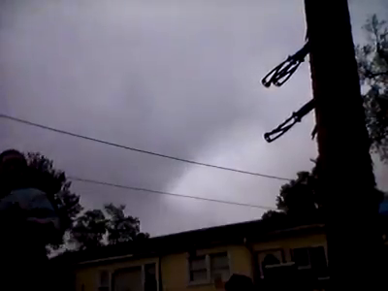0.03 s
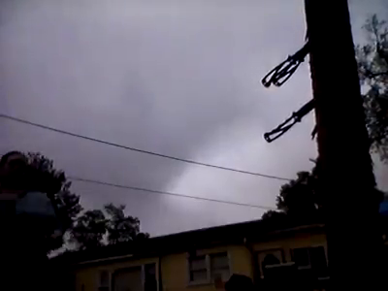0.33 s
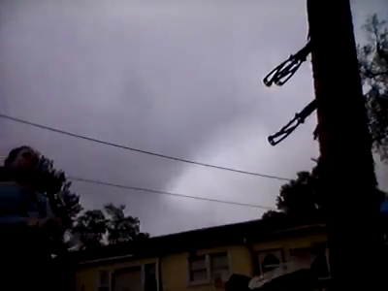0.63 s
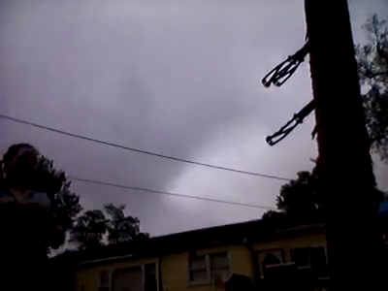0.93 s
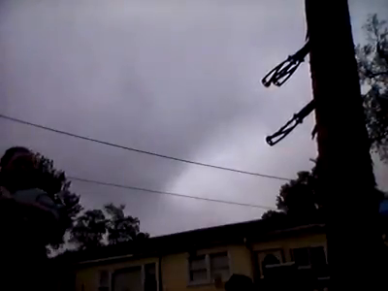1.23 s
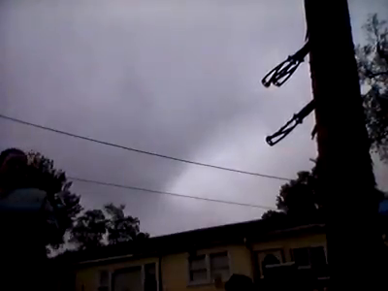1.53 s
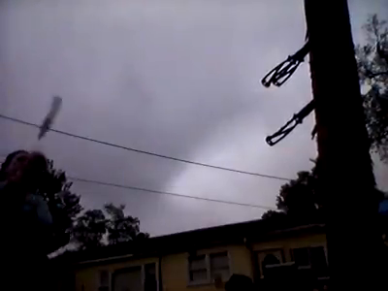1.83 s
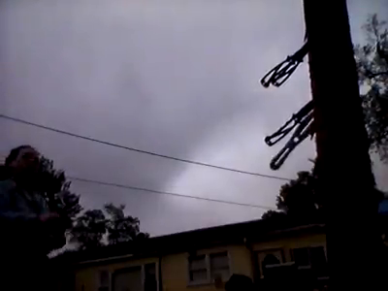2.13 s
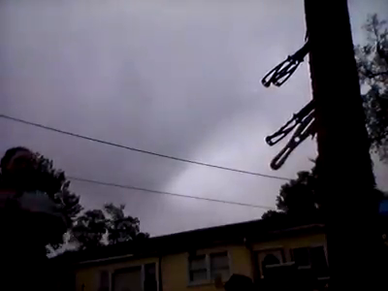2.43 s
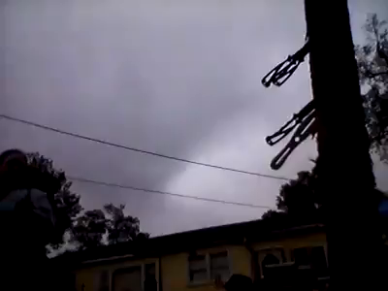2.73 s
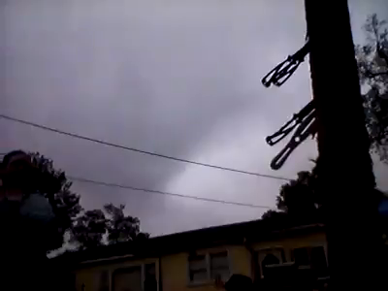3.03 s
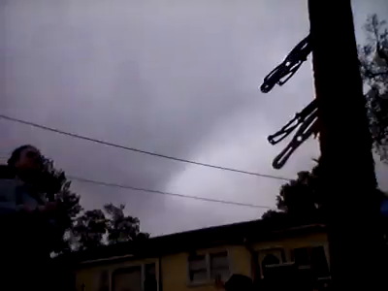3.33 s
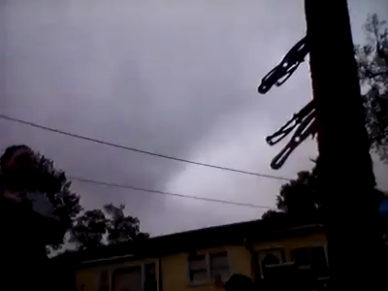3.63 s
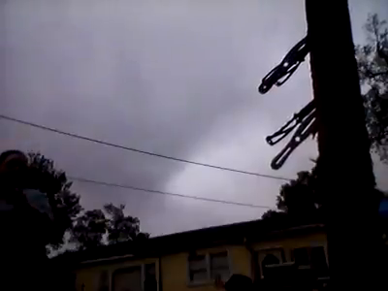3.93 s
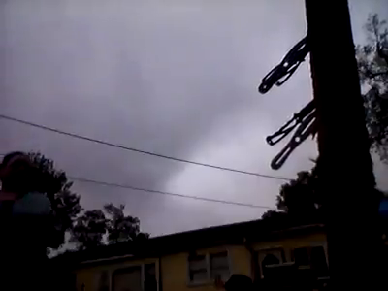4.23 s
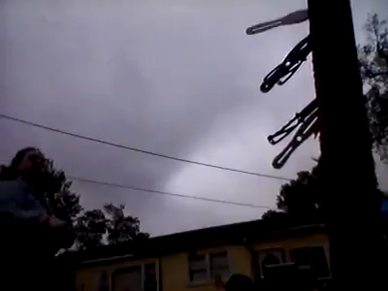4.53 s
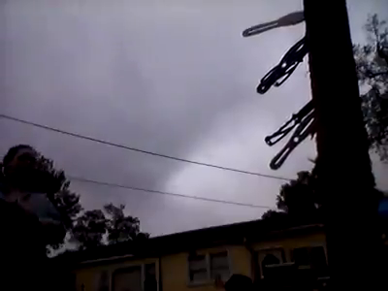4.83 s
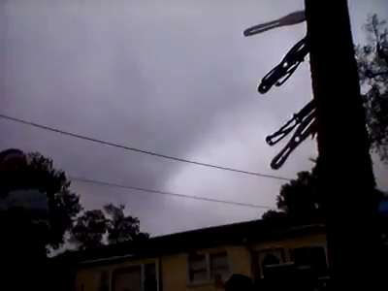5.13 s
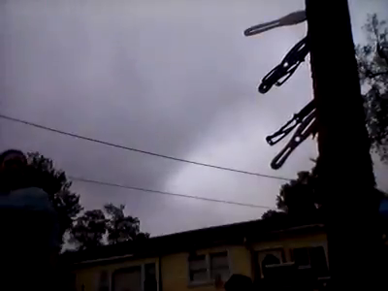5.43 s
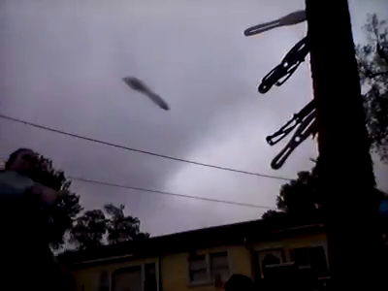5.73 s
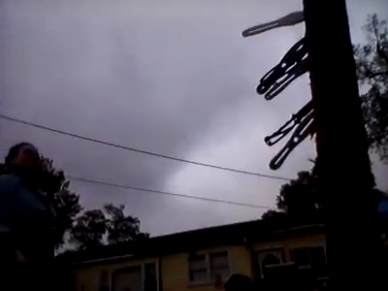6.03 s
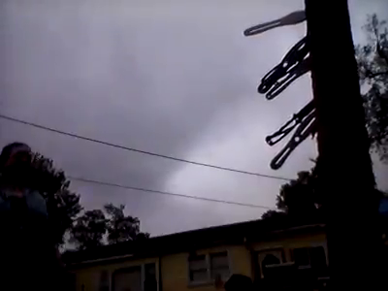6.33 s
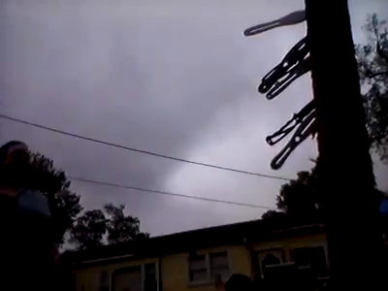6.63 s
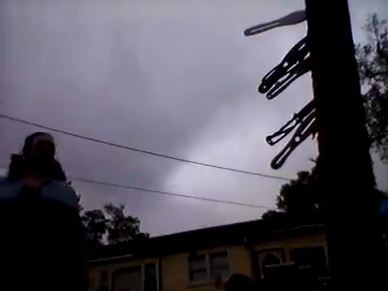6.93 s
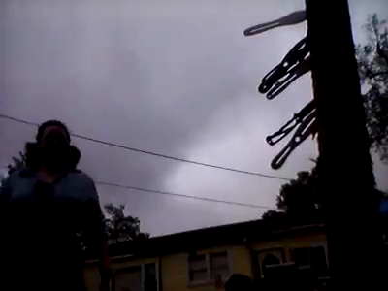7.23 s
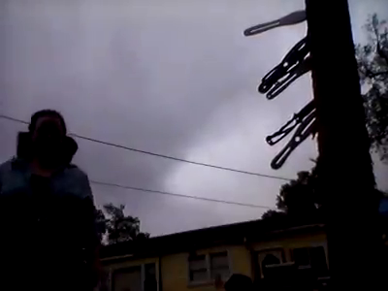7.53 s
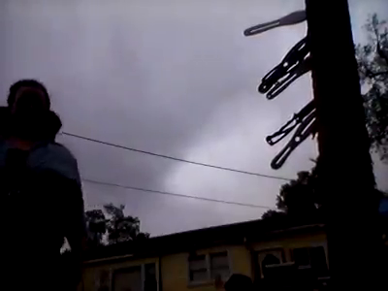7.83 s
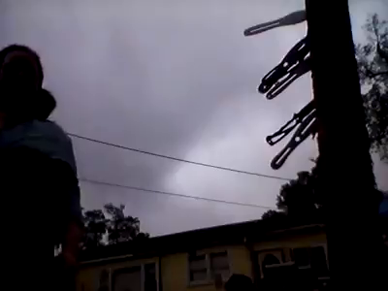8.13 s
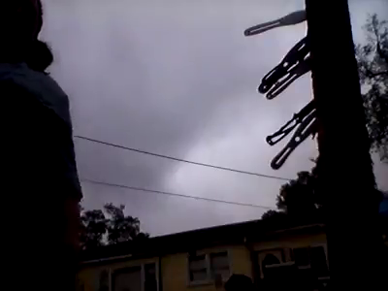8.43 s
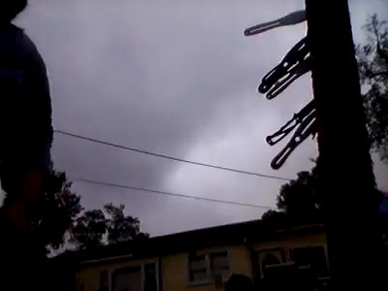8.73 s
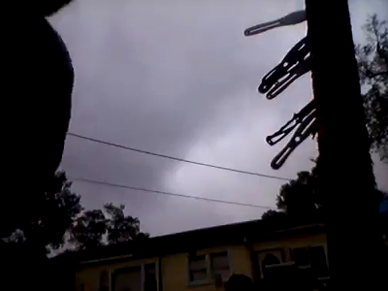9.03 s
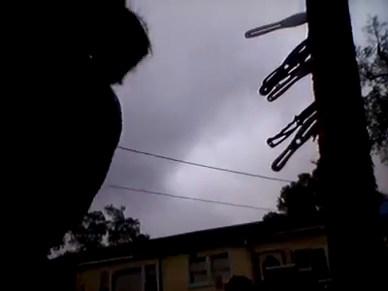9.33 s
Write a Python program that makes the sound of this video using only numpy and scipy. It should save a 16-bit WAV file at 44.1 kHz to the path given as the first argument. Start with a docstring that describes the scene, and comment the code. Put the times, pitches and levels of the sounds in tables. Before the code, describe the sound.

Outdoors, over a low traffic rumble, a thrown knife clashes with another blade and bites into a wooden post close to the microphone. Four more follow at a steady pace, each with a thin metallic zing and a loud, cracking thud, while blades scrape and tick in between. A bird repeats soft rising whistles. After the last knife rings out, the thrower approaches with swishing clothes and light scuffs, then grabs the microphone with a few knocks.

```python
"""Knife throwing in a back yard

Five steel knives sing in flight and thud into a wooden post, exciting its modes; two clash with knives
stuck there. After each throw the next blade is drawn with stick-slip friction. Birds whistle over distant
traffic. The thrower walks up and grabs a small camera, whose microphone overloads on every blow."""
import sys
import numpy as np
from scipy import signal
from scipy.fft import rfft, irfft, next_fast_len
from scipy.io import wavfile

SR = 44100
rng = np.random.default_rng(int(sys.argv[2]) if len(sys.argv) > 2 else 0)


def master_out(mix):
    """Clip the mix to full scale and print it as 16-bit PCM to the path in sys.argv[1]."""
    frames = np.transpose(np.atleast_2d(mix))
    ceiling = np.clip(frames, -1, 1)
    pcm = np.round(ceiling * 32767).astype(np.int16)
    wavfile.write(sys.argv[1], SR, pcm)


N = 414540

CLASH_S = .651  # the first blade strikes a stuck one
# Blades bite the post. Each row: start in seconds; thud, crack, splintering and steel ring in dB;
# the spot's low knock in Hz and its dB; its high knock in Hz and its dB.
HITS = [(.678, -2.5, 0, -10, -16.5, 622, 3, 1366, 4.5), (2.025, -1, -2, -6, -29, 706, -3.5, 1520, -1.5),
        (3.338, -1.5, -1, -8, -17, 788, 1, 1457, -9), (4.581, -2.5, -4, -4.5, -42, 648, 0.5, 1460, 1.5),
        (5.875, -3.5, -0.5, -5.5, -5.5, 603.4, -6, 1470, -7)]
# Spectra of a steel tick and of rubbed cloth. Each row: frequency in Hz, relative density in dB.
TICK_SPECTRUM = [(350, -47), (600, -19), (2340, -8.5), (2710, -12), (3420, -8.5), (3920, -17), (6650, -8),
                 (7830, -15.5), (10900, -2.5), (15400, -21)]
FABRIC_SPECTRUM = [(880, -15), (1500, -5.5), (2350, -5), (3240, -11.5), (6360, -10), (7430, -8.5),
                   (11100, -1.5), (12200, 2.5), (15400, -15.5)]


def amp(db):
    """Decibels to amplitude ratio."""
    return 10 ** (np.asarray(db) / 20)


def unit(x):
    """Normalisation to rms 1."""
    return x / np.sqrt(np.mean(x ** 2) + 1e-20)


def clock():
    """Seconds at every sample."""
    return np.arange(N) / SR


def along(points, hz):
    """Interpolation of (Hz, value) points on a logarithmic frequency axis."""
    f, v = np.transpose(points)
    return np.interp(np.log(hz + 1), np.log(f + 1), v)


def wobble(rate, size=N):
    """Random modulation: a curve through `rate` Gaussian knots a second."""
    knots = rng.standard_normal(int(size * rate / SR) + 4)
    return np.interp(np.arange(size) * rate / SR, np.arange(len(knots)), knots)


def noise(spectrum, size=N):
    """Spectral shaping: coloured noise of rms 1."""
    m = next_fast_len(size)
    gain = amp(along(spectrum, np.fft.rfftfreq(m, 1 / SR)))
    return unit(irfft(rfft(rng.standard_normal(m)) * gain, m)[:size])


def narrow(hz, width_hz, size):
    """Resonance: noise of rms 1 through a single peak."""
    f = np.fft.rfftfreq(size, 1 / SR)
    return unit(irfft(rfft(rng.standard_normal(size)) / (1 + ((f - hz) / width_hz) ** 2), size))


def steely(spectrum, size):
    """Modal overlap: noise of rms 1 through the many close, short resonances of a blade."""
    t = clock()[:SR // 50]
    body = rng.standard_normal(len(t)) * np.exp(-t / .004)
    return unit(signal.fftconvolve(noise(spectrum, size + len(t) - 1), body, "valid"))


def ring(modes, t, scatter_db):
    """Free vibration: a sum of damped modes, struck at random phases and scattered strengths."""
    return sum(amp(db + scatter_db * rng.standard_normal() - 60 * t / t60)
               * np.sin(2 * np.pi * (hz * t + rng.random())) for hz, db, t60 in modes)


def struck(t, t60):
    """The envelope of a tap: a quick rise and exponential decay."""
    return amp(-60 * t / t60) * (1 - np.exp(-t / 0.0015))


def add(track, s, sound):
    """Superposition: mix a sound in at s seconds."""
    part = track[max(round(s * SR), 0):][:len(sound)]
    part += sound[:len(part)]


def echo(x, decay, delay_s):
    """Reverberation: a diffuse tail in which each frequency dies at its own rate."""
    hz, t, z = signal.stft(rng.standard_normal(SR), SR, nperseg=256)
    tail = signal.istft(z * amp(-60 * t / along(decay, hz)[:, None]), SR, nperseg=256)[1]
    response = np.pad(tail / np.linalg.norm(tail), (int(delay_s * SR), 0))
    return signal.fftconvolve(x, response)[:N]


def traffic():
    """Broadband noise of distant traffic, with a faint wavering hum."""
    # Each row: frequency in Hz, relative density in dB.
    rumble_spectrum = [(11, -44), (20, 1), (38, -1.5), (87, -0.5), (190, -9), (300, -16.5), (420, -28.5),
                       (800, -75)]
    road_spectrum = [(180, -36), (300, -5), (372, -10.5), (517, -6.5), (719, -9), (1030, -8), (1930, -21),
                     (2500, -24.5), (5840, -35), (12300, -32), (15400, -41.5)]
    hum = amp(-47 + 2.5 * wobble(1.366)) * np.sin(2 * np.pi * 298 * clock() + 0.6 * wobble(6))
    rumble = amp(-30.5) * noise(rumble_spectrum)
    road = amp(-42) * noise(road_spectrum) * amp(1.1 * wobble(1.71))
    return rumble + road + hum


def whistle(length_s, first_hz, last_hz, bend):
    """Frequency modulation: a fluttering pure tone glides, straight at bend 1, later at a higher bend."""
    t = clock()[:int(length_s * SR)]
    glide = first_hz + (last_hz - first_hz) * (t / length_s) ** bend
    pitch = glide * (1 + .018 * wobble(260, len(t)))
    swell = np.sqrt(np.abs(np.sin(np.pi * t / length_s))) * amp(3.2 * wobble(110, len(t)))
    return swell * np.sin(2 * np.pi * np.cumsum(pitch) / SR)


def birds():
    """Two birds whistle; reverberation among the trees smears their notes."""
    # Each row: start in seconds, relative levels in dB of the rising note and of the slur before it.
    rising_calls = [(2.985, -40, -68), (4.156, -34, -34), (4.496, -33.5, -36), (4.846, -31, -30),
                    (5.223, -32, -33.5), (5.575, -31.5, -35)]
    # The second bird. Each row: start in seconds, relative level in dB.
    far_calls = [(.26, -45), (1.68, -52.5)]
    # Each row: frequency in Hz, reverberation time in seconds.
    tree_decay = [(1500, .32), (4000, 1.5)]
    out = np.zeros(N)
    for s, db, slur_db in rising_calls:
        add(out, s, amp(db) * whistle(length_s=.128, first_hz=2150, last_hz=3600, bend=2.2))
        add(out, s - .053, amp(slur_db) * whistle(length_s=.03, first_hz=2208, last_hz=1700, bend=.97))
    for s, db in far_calls:
        add(out, s, amp(db) * whistle(length_s=.23, first_hz=3300, last_hz=2900, bend=1.6))
    return amp(-3) * out + amp(-1.5) * echo(out, tree_decay, delay_s=0.029)


def blade(t, shake_db, rate, sung_hz=0, sung_db=0):
    """A blade's high modes decay, each wavering on its own; the one near sung_hz sings out."""
    # Each row: frequency in Hz, level in dB, 60 dB decay time in seconds.
    blade_modes = [(6185, -21, .6), (8064, -14, .8), (8812, -16, .5), (9561, -16, .8), (10310, -8, .7),
                   (11060, 0, .9), (12190, -1, .9), (13310, -14, .6), (14810, -9, 1.1)]
    out = np.zeros(len(t))
    for hz, db, t60 in blade_modes:
        boost_db = sung_db * (abs(hz - sung_hz) < .03 * hz)
        mode = amp(db + boost_db - 60 * t / t60) * np.sin(2 * np.pi * (hz * t + rng.random()))
        out += mode * amp(shake_db * wobble(rate, len(t)))
    return out


def flights():
    """Free vibration: a blade scrapes off the hand and sings, wavering as it tumbles, until impact."""
    # Each row: start in seconds, ring in dB, scrape in dB, the singing mode in Hz, its boost in dB.
    throws = [(.567, -32, -63, 11060, 5), (1.933, -31.5, -40, 8064, 9), (3.235, -29, -39.5, 10310, 2),
              (3.263, -23.5, -43, 12190, 7), (4.46, -47, -35, 14810, 13), (5.781, -40.5, -40, 9561, 16)]
    out, t = np.zeros(N), clock()[:SR // 4]
    impacts = [CLASH_S] + [hit[0] for hit in HITS]
    for s, db, scrape_db, sung_hz, sung_db in throws:
        end = min(impact for impact in impacts if impact > s)
        song = amp(db) * blade(t, shake_db=1.6, rate=50, sung_hz=sung_hz, sung_db=sung_db)
        scrape = amp(scrape_db - 60 * t / 0.76) * narrow(11200, 2000, len(t))
        airborne = np.clip(t / 0.0049, 0, 1) * np.clip((end - s - t) / 0.023, 0, 1)
        add(out, s, (song + scrape) * airborne)
        swish = amp(-44 - 120 * abs(t - .05)) * noise(FABRIC_SPECTRUM, len(t))
        add(out, s - .05, swish)
    return out


def buzzing(rate, depth_db, drift, half_width_s=0.043):
    """Repeated knocks drive modes that swell in turn, roughly highest first, and drift in phase."""
    # Each row: frequency in Hz, level in dB, time of the peak in seconds.
    clash_modes = [(1400, -14, .9), (1863, -1, .868), (2335, 3, .825), (2930, 1, .84), (3830, -4, .85),
                   (4081, -3, .87), (4175, -1, .87), (6105, 0, .825), (6750, -6, .75), (8506, -4, .815),
                   (8860, -5, .79), (9561, 1, .765), (9878, -5, .87), (10435, -3, .87), (11062, 7, .8),
                   (13312, 3, .705), (14812, 1, .705)]
    t = clock()[:2 * SR]
    tones = np.zeros(len(t))
    for hz, db, peak_s in clash_modes:
        random_walk = np.cumsum(wobble(2 * rate, len(t))) * np.sqrt(2 * rate) / SR
        phase = drift * np.sqrt(clash_modes[0][0] / hz) * random_walk
        swell = amp(db + depth_db * wobble(rate, len(t))) / np.hypot(1, (t - peak_s) / half_width_s)
        tones += swell * np.sin(2 * np.pi * hz * t + phase)
    return np.pad(tones, (0, N - len(t)))


def shaken(build_s, held_db, drop_db, fade_db_per_s, chatter_s=0.25, parting_s=0.036):
    """The envelope of forced vibration: it builds as blades chatter, drops as they part, then decays."""
    t = clock() - CLASH_S
    free = np.maximum(t - chatter_s, 0)
    level_db = held_db - drop_db * np.minimum(free / parting_s, 1) - fade_db_per_s * free
    return np.clip(t / build_s, 0, 1) * amp(level_db)


def chatter():
    """Intermittent contact: the first knife scrapes and rattles on its neighbour, then both ring free."""
    # Each row: frequency in Hz, relative density in dB.
    rasp_spectrum = [(180, -45), (300, -12), (476, -16), (640, -11), (1320, -14), (2170, -16), (2920, -13),
                     (5290, -21), (8700, -16), (13000, -10), (15400, -18)]
    t = clock() - CLASH_S
    glance = (t > 0) * amp(-4 - 60 * np.abs(t) / 0.51)
    rasping = np.hypot(glance, shaken(build_s=0.1, held_db=-18, drop_db=2.5, fade_db_per_s=99))
    ringing = shaken(build_s=.03, held_db=-19.5, drop_db=8, fade_db_per_s=60)
    tones = buzzing(rate=80, depth_db=3.5, drift=13)
    rattle = amp(2 * wobble(250))
    return rattle * (ringing * tones + rasping * steely(rasp_spectrum, N))


def jolts():
    """High-pass overshoot: a shock holds the microphone aside; let go, it crosses centre and settles."""
    # Each row: start in seconds, level in dB, length of the push in seconds.
    shocks = [(.651, 0, 0.036), (5.883, -3.5, 0.028), (8.571, -19, 0.016), (9.337, -4.5, 0.0024),
              (9.364, -6, 0.00213), (9.396, -4.5, 0.0015)]
    out, t = np.zeros(N), clock()[:SR // 2]
    for s, db, length in shocks:
        release_s, settle_s = 0.36 * length, 2.05 * length
        push = (1 - np.exp(-t / 0.00049)) * np.exp(-np.maximum(t - length, 0) / release_s)
        leak = np.exp(-1 / (settle_s * SR))
        add(out, s, -amp(db) * signal.lfilter([1, -1], [1, -leak], push))
    return out


def thuds(crack_t60=0.041, wood_t60=0.16, crack_rise_s=.0008, boom_rise_s=0.0057):
    """Impact excitation: the point cracks in, fibres split, and the post's modes swell into a boom."""
    # Each row: frequency in Hz, level in dB, 60 dB decay time in seconds.
    post_modes = [(299, -20, .5), (334, -13.5, .42), (600, -12, .17), (815, -15, .17), (1290, -14, .08),
                  (1618, -13, .06), (2600, -1, .025)]
    # Each row: frequency in Hz, relative density in dB.
    crack_spectrum = [(180, -34), (300, -11), (1540, 8), (2030, -5), (2690, 1.5), (4200, -9), (5200, -11),
                      (9580, -9), (12300, -1), (15400, -13)]
    wood_spectrum = [(100, -22.5), (330, 5.5), (450, -7.5), (720, 4), (1020, -13.5), (1400, -8.5),
                     (2200, -20), (4300, -26), (14000, -40)]
    out, t = np.zeros(N), clock()[:SR // 2]
    for s, db, crack_db, wood_db, steel_db, low_hz, low_db, high_hz, high_db in HITS:
        modes = post_modes + [(low_hz, low_db, .1), (high_hz, high_db, .06)]
        boom = amp(db) * ring(modes, t, scatter_db=1.0)
        splinters = amp(wood_db - 60 * t / wood_t60) * noise(wood_spectrum, len(t))
        crack = amp(crack_db - 60 * t / crack_t60) * steely(crack_spectrum, len(t))
        steel = amp(steel_db - 60 * t / 0.17) * blade(t, shake_db=5, rate=204)
        # the knife quivers and knocks in its cut on every swing
        swings = np.sin(np.pi * (31 * t + .2 * wobble(25, len(t)))) ** 6
        quiver = amp(-18.5 - 60 * t / 0.47) * swings * narrow(1380, 500, len(t))
        add(out, s, (boom + splinters + quiver) * (1 - np.exp(-t / boom_rise_s)))
        add(out, s, (crack + steel) * (1 - np.exp(-t / crack_rise_s)))
    return out


def draws(grain_db=2.0, release_s=0.011, song_hz=2460):
    """Stick-slip friction: a blade slides ever faster along the next and its tip slips off with a tick."""
    # Each row: start in seconds, end in seconds, level in dB.
    strokes = [(1, 1.06, -22.5), (2.34, 2.427, -21.5), (3.647, 3.796, -18.5), (4.92, 5.048, -16.5),
               (6.195, 6.32, -19.5), (2.55, 2.587, -36.5), (4.024, 4.057, -29)]
    # Each row: frequency in Hz, relative density in dB.
    slide_spectrum = [(180, -35), (300, -6.5), (800, -6), (1180, 0), (1720, -6.5), (2300, -2), (3120, -0.5),
                      (4410, -8.5), (6340, -4.5), (8000, -16), (11500, -4.5), (15400, -18)]
    out, t = np.zeros(N), clock()[:SR // 4]
    for s, end, db in strokes:
        speed = np.minimum(t / (end - s), 1) ** 0.52 * np.exp(-np.maximum(t - end + s, 0) / release_s)
        # the rubbed steel sings most while it is still held near the hilt
        song = amp(-2 - 60 * t / 0.35) * narrow(song_hz, 190, len(t))
        friction = amp(db + grain_db * wobble(700, len(t))) * speed
        add(out, s, friction * (steely(slide_spectrum, len(t)) + song))
        add(out, end, amp(-24) * steely(TICK_SPECTRUM, len(t)) * struck(t, t60=0.028))
    return out


def contact(clack_hz, size):
    """Contact noise: the rough tick of steel on steel, with a clack of two resonances."""
    clack = narrow(clack_hz, 148, size) + amp(-8) * narrow(1.51 * clack_hz, 247, size)
    return (steely(TICK_SPECTRUM, size) + amp(-3) * clack) * amp(2.5 * wobble(258, size))


def clinks():
    """Steel taps steel, and a stuck knife knocks once just after the second hit; after the last throw one
    handle rings on in sympathetic vibration."""
    # Each row: start in seconds, tick in dB, ring in dB, the envelope's t60 in seconds, clack in Hz.
    taps = [(1.243, -21.5, -24, 0.064, 12360), (1.276, -30, -40, .12, 9530), (2.069, -23, -42, .11, 1340),
            (2.232, -24, -26, .16, 12880), (3.666, -24, -15, 0.38, 2540), (3.875, -22, -26.5, 0.184, 3400),
            (5.931, -17.5, -7.5, 0.08, 11300), (5.943, -22, -31, 0.72, 11400),
            (6.33, -21.5, -38.5, 0.028, 2380)]
    # Each row: frequency in Hz, level in dB, 60 dB decay time in seconds.
    handle_modes = [(2328, -26, 3.16), (9835, -55, 1.5), (13700, -66, 3)]
    out, t = np.zeros(N), clock()[:SR // 2]
    for s, tick_db, ring_db, t60, clack_hz in taps:
        tick = amp(tick_db) * contact(clack_hz, len(t))
        steel = amp(ring_db) * blade(t, shake_db=3.5, rate=170)
        add(out, s, (tick + steel) * struck(t, t60))
    t = clock()[:3 * SR]
    add(out, HITS[-1][0], ring(handle_modes, t, scatter_db=0) * (1 - np.exp(-t / 0.055)))
    return out


def rebounds():
    """Elastic recoil: a knife that has just stuck swings back and knocks against the wood."""
    # Each row: start in seconds, level in dB, clack in Hz.
    knocks = [(2.101, -12, 1490), (2.202, -19.5, 1520), (3.401, -23.5, 2400), (3.521, -21.5, 2400),
              (4.648, -17, 1350), (4.755, -23.5, 1610)]
    # Each row: frequency in Hz, relative density in dB.
    knock_spectrum = [(400, -23), (1300, 4), (3300, -3), (4500, -15), (14000, -14)]
    out, t = np.zeros(N), clock()[:SR // 4]
    for s, db, clack_hz in knocks:
        knock = 0.75 * steely(knock_spectrum, len(t)) + 0.58 * narrow(clack_hz, 170, len(t))
        add(out, s, amp(db) * knock * struck(t, t60=0.062))
    return out


def clothes(rustle_db=-47, nearest_s=9.7, approach_db_per_s=17.5):
    """Incoherent sources add in power: cloth rustles louder as the thrower nears, and limbs swish."""
    # Each row: time of the peak in seconds, level in dB, half-width in seconds.
    swishes = [(8.42, -36.5, .085), (8.58, -38.5, 0.042), (8.69, -35, 0.082), (9.1, -41.5, 0.055)]
    t = clock()
    power = amp(rustle_db - approach_db_per_s * np.abs(t - nearest_s)) ** 2
    for s, db, width in swishes:
        power += (amp(db) / (1 + ((t - s) / width) ** 2)) ** 2
    return np.sqrt(power) * noise(FABRIC_SPECTRUM) * amp(1.8 * wobble(150))


def scuffs():
    """Damped impacts: feet and fingers make short bursts of midrange noise."""
    # Each row: start in seconds, level in dB, 60 dB decay time in seconds.
    touches = [(8.675, -35.5, 0.34), (8.793, -22, 0.03), (9.335, -22.5, 0.04), (9.365, -12, 0.012)]
    # Each row: frequency in Hz, relative density in dB.
    scuff_spectrum = [(150, -19), (1200, 16.5), (2500, -1.5), (5000, -14), (14000, -17)]
    out, t = np.zeros(N), clock()[:SR // 4]
    for s, db, t60 in touches:
        add(out, s, amp(db - 60 * t / t60) * noise(scuff_spectrum, len(t)))
    return out


def grip(attack_s=.004, release_s=.01):
    """Friction noise: a hand touches, then grips the camera's case, rubbing as long as it presses."""
    # Each row: start in seconds, length in seconds, level in dB.
    presses = [(9.301, 0.066, -35.5), (9.365, .04, -16.5)]
    # Each row: frequency in Hz, relative density in dB.
    case_spectrum = [(120, -35), (200, 2), (741, -9), (1530, -8.5), (3290, -10.5), (4020, -17), (5380, -12),
                     (7880, -17), (12200, 2), (15400, -22.5)]
    pressure, t = np.zeros(N), clock()
    for s, length, db in presses:
        release = np.exp(-np.maximum(t - s - length, 0) / release_s)
        pressure += amp(db) * np.clip((t - s) / attack_s, 0, 1) * release
    return pressure * noise(case_spectrum) * amp(1.7 * wobble(700))


def scene():
    """Direct sound and reflection: the knives and their echo from the house, over the yard's sounds."""
    # Each row: frequency in Hz, reverberation time in seconds.
    yard_decay = [(200, 0.17), (1500, 1), (4000, 1), (12000, 0.77)]
    blows, scrapes = thuds(), draws()
    steel = flights() + clinks() + rebounds() + chatter()
    walls = echo(amp(-13.5) * blows + amp(-18) * (steel + .5 * scrapes), yard_decay, delay_s=.035)
    # the house front throws back the low boom of the post
    boom_band = signal.butter(2, [270, 400], "bandpass", fs=SR, output="sos")
    add(walls, .108, amp(-10.5) * signal.sosfilt(boom_band, blows))
    knives = blows + steel + scrapes + walls
    return (knives + jolts() + birds() + clothes() + grip() + scuffs() + traffic())[None]


def record(dry, hardness=5, top_hz=15600):
    """Saturation and band limiting: the input stage clips the blows; nothing passes above top_hz."""
    clipped = dry / (1 + np.abs(dry) ** hardness) ** (1 / hardness)
    m = next_fast_len(N + SR // 2)
    passband = np.fft.rfftfreq(m, 1 / SR) < top_hz
    return irfft(rfft(clipped, m) * passband, m)[..., :N]


dry = scene()
out = record(dry)
master_out(out)
```